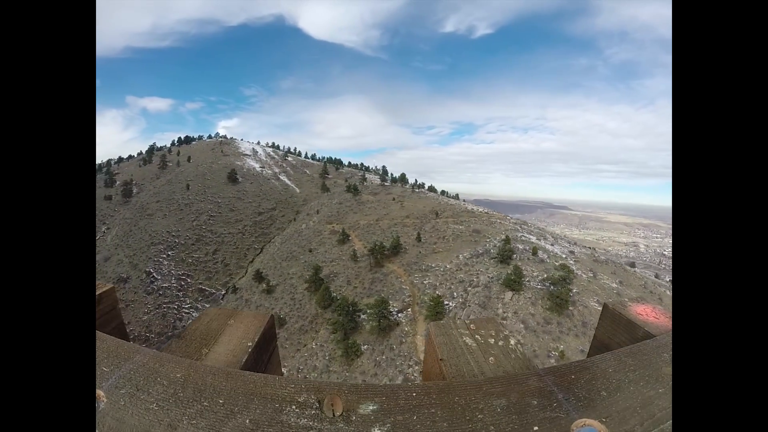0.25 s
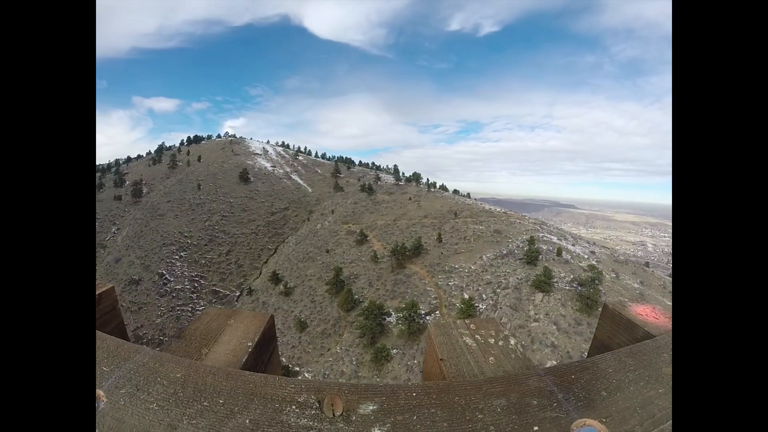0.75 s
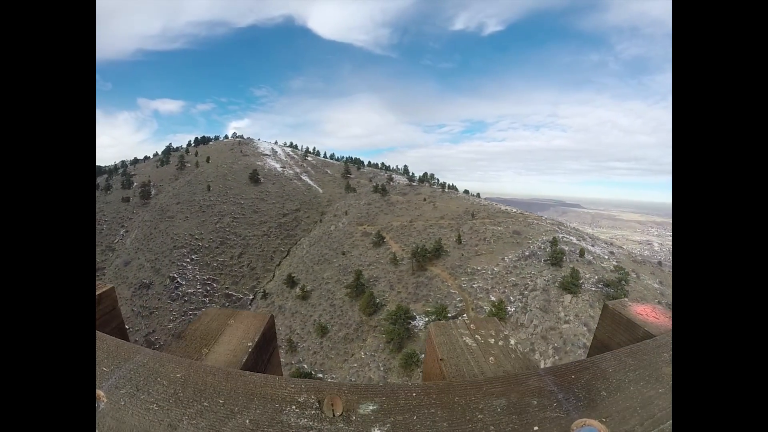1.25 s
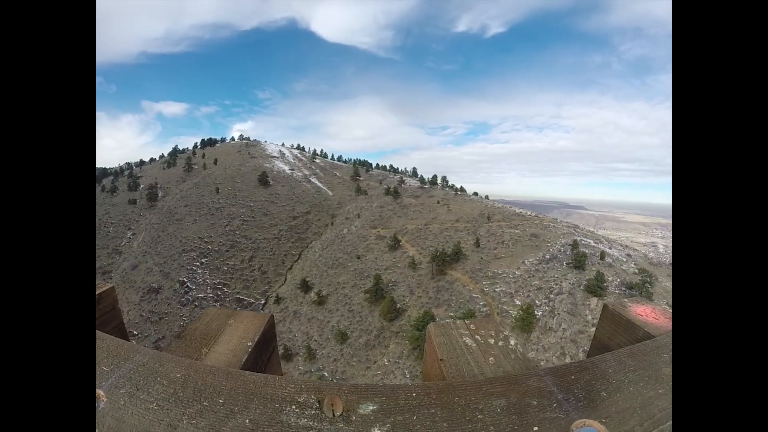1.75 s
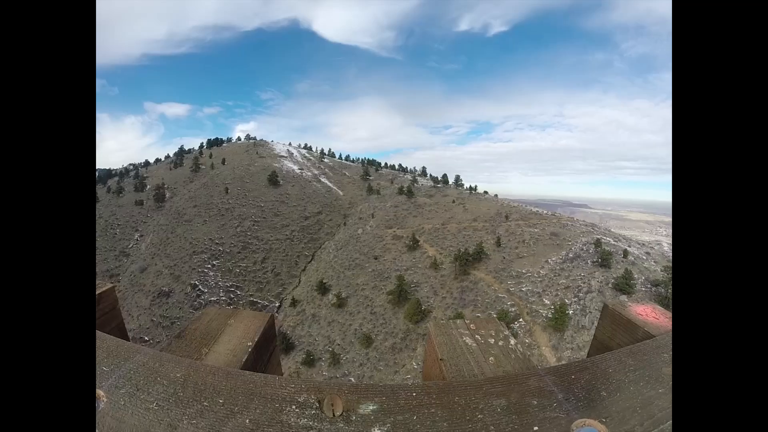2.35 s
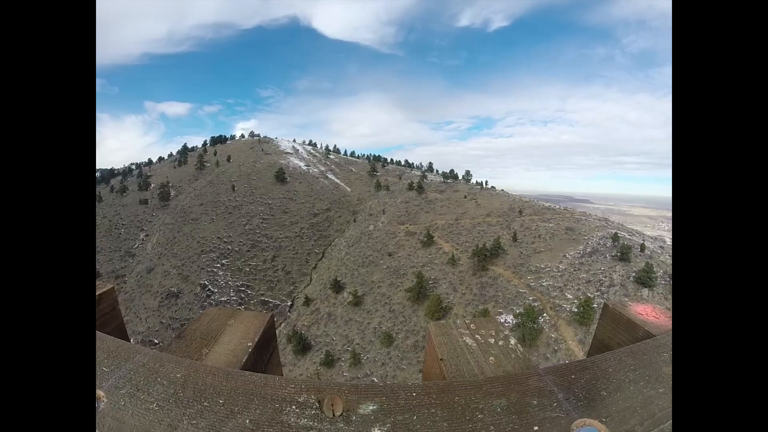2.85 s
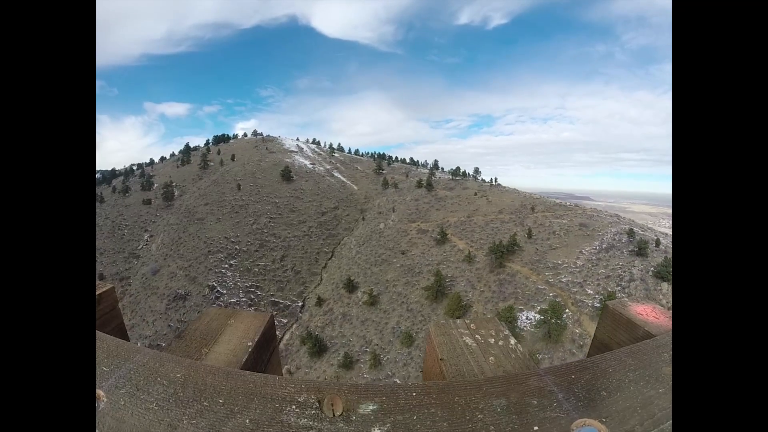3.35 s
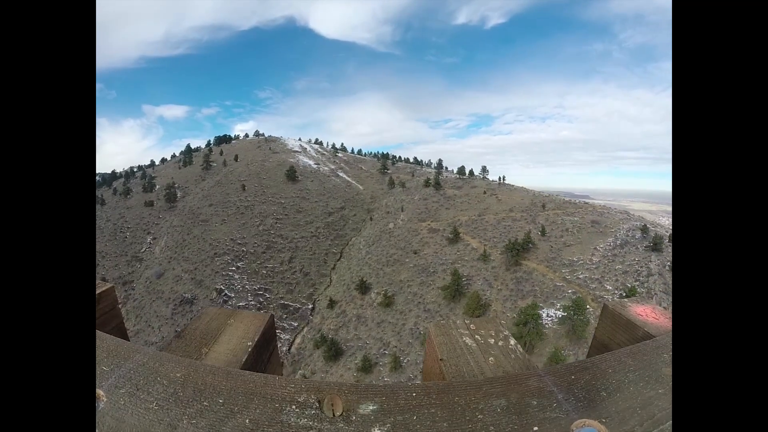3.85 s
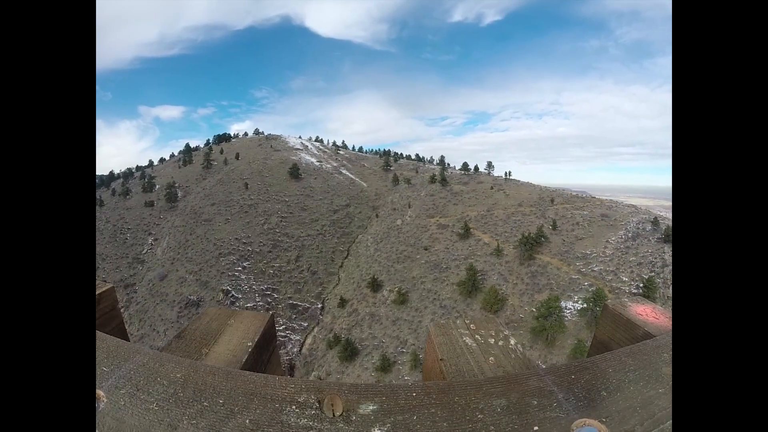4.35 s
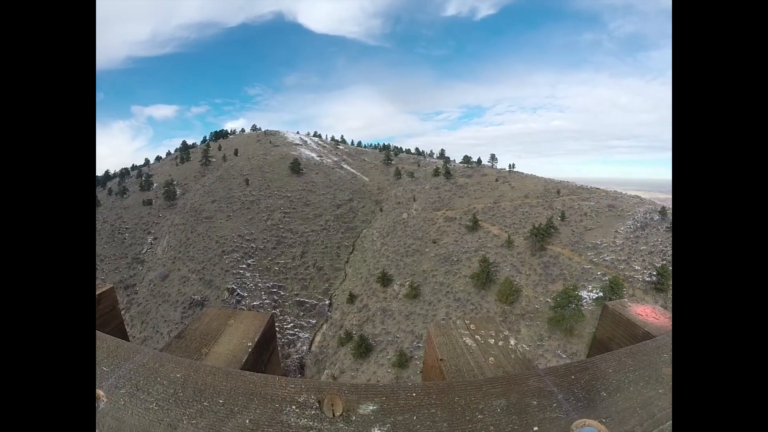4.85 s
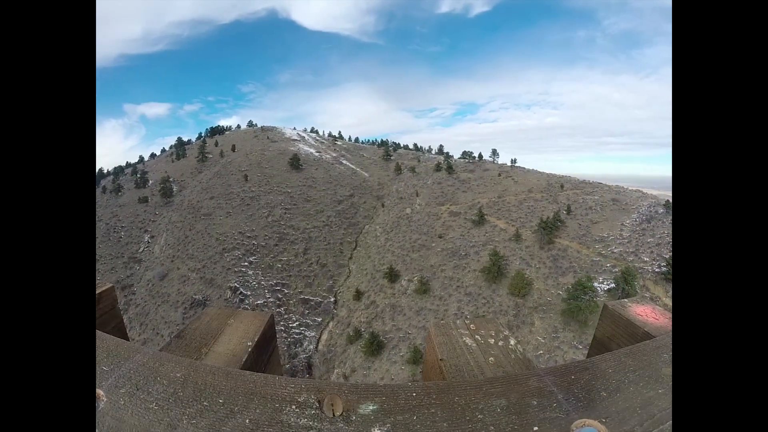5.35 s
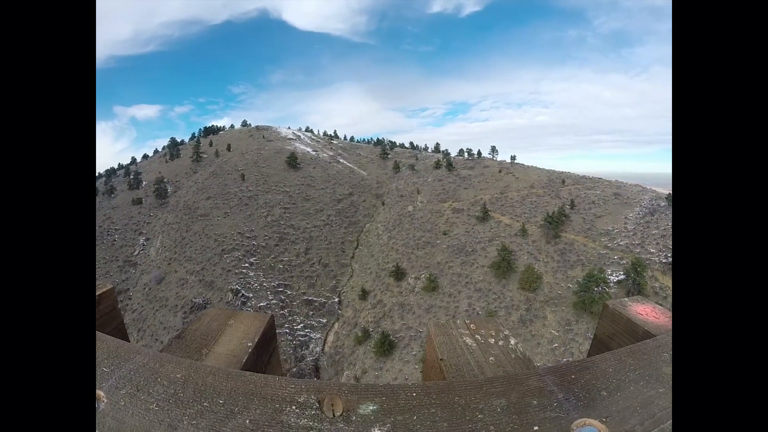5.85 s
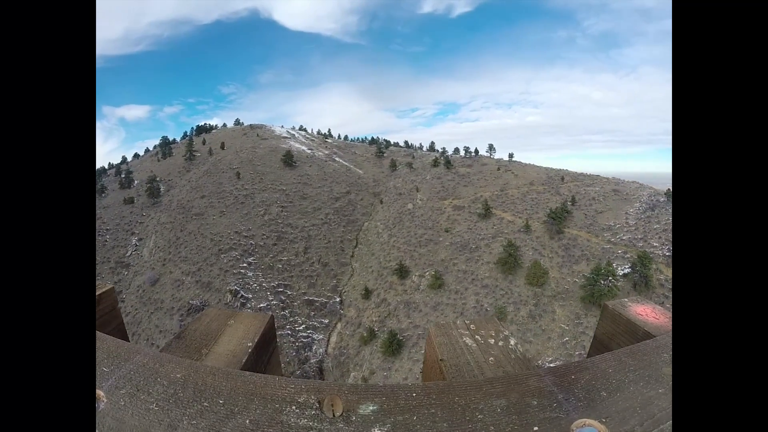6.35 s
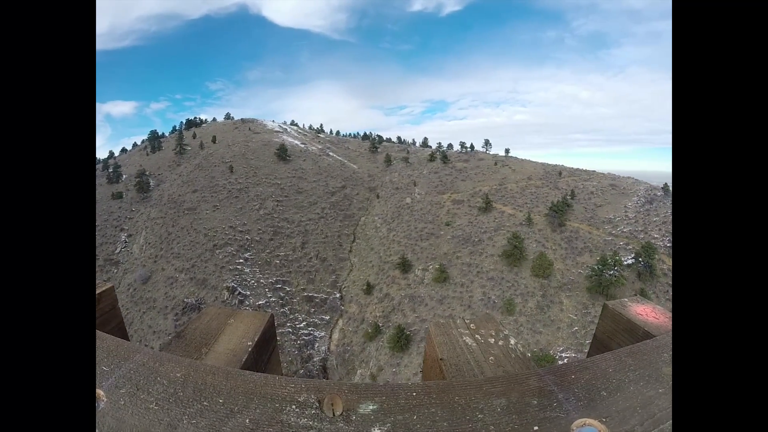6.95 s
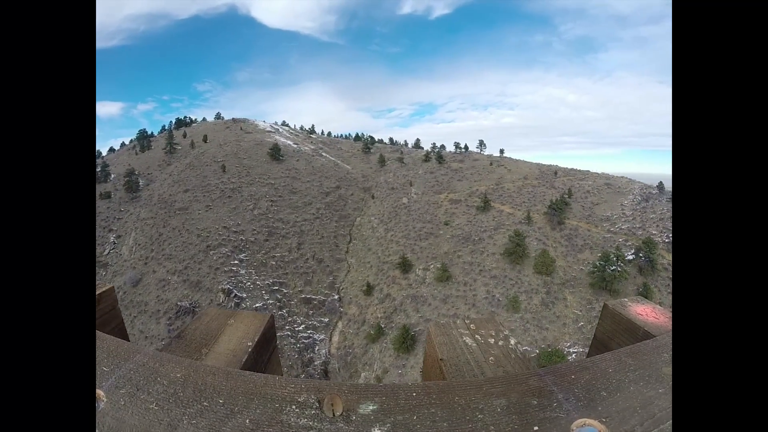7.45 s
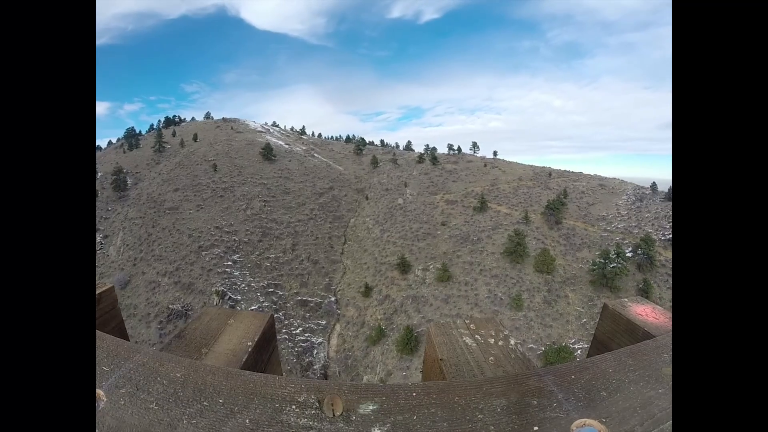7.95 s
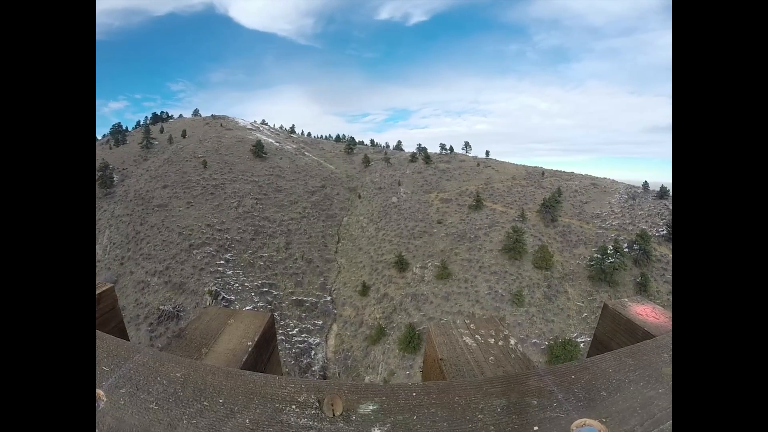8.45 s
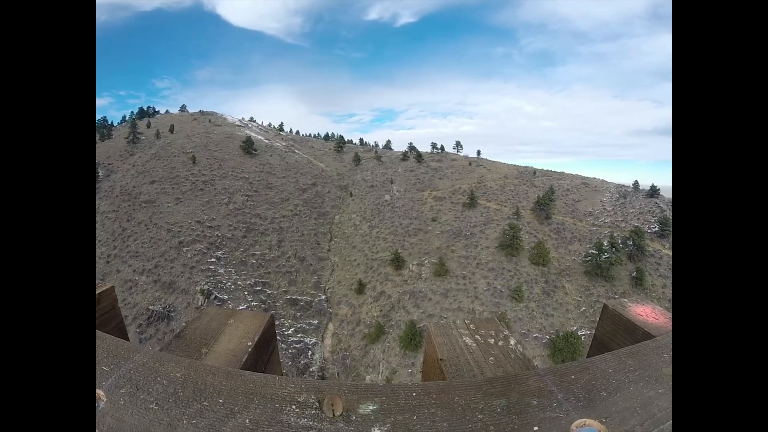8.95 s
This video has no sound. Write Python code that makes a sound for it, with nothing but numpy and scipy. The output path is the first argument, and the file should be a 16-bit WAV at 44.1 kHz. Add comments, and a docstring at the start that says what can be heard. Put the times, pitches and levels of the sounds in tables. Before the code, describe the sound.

Continuous helicopter flight noise from a small case mounted outside the aircraft. A harsh, resonant roar pulses about eleven times a second, with a faster tail-rotor flutter and steady turbine hiss. Low wind rumbles and hoots in hollow tones; from just over four seconds gusts spit and slap hard on the case, easing after about six, and the chop stands out again.

```python
"""A deep roar chopped about eleven times a second: a helicopter in forward flight, heard under its rotor.
The microphone sits in a small case mounted outside; the rotors modulate noise that rings in the case.
Slipstream eddies rumble as low noise and hoot across hollows as wavering sines.
Gusts spit and slap on the case as noise bursts; the turbine hisses as steady noise and its gears and
compressor sing as faint tones."""
import sys
import numpy as np
from scipy import signal
from scipy.fft import rfft, irfft, next_fast_len
from scipy.io import wavfile
from scipy.ndimage import uniform_filter1d

SR = 44100
rng = np.random.default_rng(int(sys.argv[2]) if len(sys.argv) > 2 else 0)


def materialize(psi):
    """Save the field psi as 16-bit PCM at rate SR to the path in sys.argv[1].

    A 1-D psi becomes a single channel; in a 2-D psi each row is a channel.
    """
    bounded = np.clip(np.atleast_2d(psi).T, -1, 1)
    quanta = np.round(bounded * 32767).astype(np.int16)
    wavfile.write(sys.argv[1], SR, quanta)


N = 406161


def from_db(db):
    """Logarithmic level: decibels to amplitude gain."""
    return 10 ** (np.asarray(db) / 20)


def rms_one(x):
    """Power normalisation: scale to an rms of one."""
    return x / np.sqrt(np.mean(x ** 2) + 1e-20)


def noise():
    """White noise: equal mean power at every frequency."""
    return rng.standard_normal(N)


def in_time(rows):
    """Linear interpolation: each column after time_s, sample by sample."""
    time_s, *columns = np.transpose(rows)
    return [np.interp(np.arange(N) / SR, time_s, column) for column in columns]


def cycles_of(hz):
    """Phase as the integral of frequency: cycles completed at a changing rate."""
    return np.cumsum(hz) / SR


def drift(rate_hz):
    """Low-passed chance: a random curve changing about rate_hz times a second, rms about 1."""
    # computed at a tenth of the sample rate; the first 8000 points let the filter settle
    pole = np.exp(-20 * np.pi * rate_hz / SR)
    slow = signal.lfilter([1], [1, -2 * pole, pole * pole], rng.standard_normal(N // 10 + 8002))[8000:]
    return np.interp(np.arange(N) / 10, np.arange(len(slow)), rms_one(slow))


def colour(x, spectrum, modes=()):
    """Minimum-phase filtering: a smooth spectrum with resonances that ring after excitation; rms 1."""
    size = 2 * next_fast_len(N // 2 + SR // 2)
    hz = np.maximum(np.arange(size // 2 + 1) * SR / size, 1)
    points_hz, levels_db = np.transpose(spectrum)
    response_db = np.interp(np.log(hz), np.log(points_hz), levels_db)
    for centre_hz, width_hz, boost_db in modes:
        response_db = response_db + boost_db / (1 + (2 * (hz - centre_hz) / width_hz) ** 2)
    # folding the cepstrum onto positive times makes the filter causal
    cepstrum = irfft(np.log(from_db(response_db)))
    cepstrum[1:size // 2] *= 2
    cepstrum[size // 2 + 1:] = 0
    response = np.exp(rfft(cepstrum))
    return rms_one(irfft(rfft(x, size) * response)[:N])


def cut(x, hz, kind, order=2):
    """Butterworth filtering: a low-pass or high-pass with a flat pass band."""
    return signal.sosfilt(signal.butter(order, hz, kind, fs=SR, output="sos"), x)


def tone(hz, wander_hz, rate_hz, flutter_db):
    """Random frequency and amplitude modulation: a sine shaken by turbulence; rms 1."""
    cycles = cycles_of(hz + wander_hz * drift(rate_hz))
    return rms_one(np.sin(2 * np.pi * cycles) * from_db(flutter_db * drift(rate_hz)))


def bursts_at(rows, rise_s):
    """Impulsive envelope: a quick swell and decay at each (time_s, peak_db)."""
    swell = np.zeros(N)
    age = np.arange(SR // 20) / SR / rise_s  # in rise times
    for time_s, peak_db in rows:
        start = int((time_s - rise_s / 2) * SR)
        swell[start:start + len(age)] += from_db(peak_db) * age * np.exp(1 - age)
    return swell


def held(start_s, length_s, attack_s, release_s):
    """Trapezoidal envelope: ramps centred on the start and the end, full level between."""
    t = np.arange(N) / SR
    rise = (t - start_s) / attack_s
    fall = (start_s + length_s - t) / release_s
    return np.clip(np.minimum(rise, fall) + .5, 0, 1)


# Main rotor's pace. Columns: time_s, blade_rate_hz
BLADE_RATE = [(0, 10.84), (1.0, 10.86), (1.7, 10.77), (2.3, 10.76), (3.0, 10.81), (3.6, 10.74),
              (4.9, 10.66), (6.2, 10.69), (6.9, 10.77), (8.2, 10.69), (9.2, 10.7)]


def blade_passes():
    """Periodic excitation: blade passes counted from the first, at .045 s."""
    return cycles_of(in_time(BLADE_RATE)[0]) - .045 * BLADE_RATE[0][1]


def blade_wash(passes, edge=3.0):
    """Saturated cosine: near +1 while a blade's wash sweeps over the case, near -1 between blades."""
    return np.tanh(edge * np.cos(2 * np.pi * passes))


# Blade loading. Columns: time_s, roar_db, chop_db (swing either way), whoosh_db
BLADE_LOAD = [(0, -31.5, 0.5, -50), (1.2, -32, 2, -51), (2.2, -33.5, 2.5, -59), (2.7, -32, 2, -59),
              (3.2, -33, 2.5, -56), (4.1, -34, 2, -47), (5.0, -32.5, 3, -46.5), (6.0, -32.5, 2.5, -41.5),
              (7.0, -32.5, 2.5, -46), (7.8, -33.5, 4.5, -44.5), (8.5, -32.5, 3.5, -44.5),
              (9.2, -33.5, 4, -42)]
# Tip vortex, one hit in each pass. Columns: time_s, place_passes, boost_db
TIP_VORTEX = [(0, -0.062, -4), (.5, -0.053, 1), (1.8, 0.059, -2), (2.3, 0.035, 7), (2.9, 0.017, 3),
              (3.3, -0.12, 7), (4.3, -0.17, 2.5), (7.0, -0.3, 6.5), (7.8, -0.23, 6.5), (8.4, -0.21, 5.5),
              (9.2, -0.23, 0)]
# Sharpest blade cracks. Columns: time_s, peak_db (before the crack gain and the colouring)
BLADE_CRACKS = [(0.1431, -17), (0.2016, -23), (0.5058, -13), (2.5408, -13), (3.914, -14), (4.566, -25),
                (5.4103, -15), (7.3695, -16), (7.8262, -20), (7.9309, -25.5), (8.1179, -18), (8.302, -19),
                (8.704, -14), (8.7697, -15.5)]
# Roar spectrum, relative density. Columns: frequency_hz, density_db (per Hz)
ROAR_SPECTRUM = [(120, 7), (280, -1), (400, -5.5), (700, -2), (1000, -3), (1270, -11), (1800, -8.5),
                 (2500, -11), (3200, -15.5), (3900, -27.5), (5500, -26.5), (8000, -35), (11000, -43.5),
                 (15000, -45)]
# Case resonances, and a notch where negative. Columns: centre_hz, width_hz, boost_db
CASE_MODES = [(490, 55, 4), (782, 190, 4.5), (1474.6, 204, 12.5), (1607.6, 160, 12.5), (2138, 360, 14.5),
              (2260, 230, 2.5), (2780, 340, 9), (3590, 390, 6.5), (4307, 340, 13.5), (4980, 190, 10),
              (5810, 140, 7.5), (6400, 224, 2.5), (6870, 240, 6.5), (7370, 300, 6), (8300, 270, 11),
              (8540, 170, -11), (8860, 310, 14), (9660, 450, 10), (10330, 290, 14.5), (11400, 620, 7),
              (12700, 467, 6.2)]


def roar(passes, tail_db=1.5, grain_db=2.0, vortex_passes=0.033, crack_db=-3.5,
         hiss_db=6.0, hiss_grain_db=1.5, split_hz=5200):
    """Amplitude-modulated noise: both rotors chop the roar, turbine hiss tops it, the case resonates."""
    level_db, chop_db, _ = in_time(BLADE_LOAD)
    place, vortex_db = in_time(TIP_VORTEX)
    # sudden, then fading
    since_vortex = (passes - place + vortex_passes / 2) % 1
    vortex = np.exp(-(since_vortex / vortex_passes) ** 2)
    # the tail rotor flutters 5.09 times per main blade pass, with a second harmonic
    tail_passes = 5.09 * passes
    tail = np.cos(2 * np.pi * tail_passes) + 0.75 * np.cos(4 * np.pi * tail_passes)
    swell_db = chop_db * blade_wash(passes) + vortex_db * vortex + tail_db * tail + grain_db * drift(190)
    chopped = rms_one(from_db(swell_db) * noise())
    # the roar level, applied last, is taken out of the cracks first
    cracks = bursts_at(BLADE_CRACKS, rise_s=0.00036) * from_db(crack_db - level_db) * noise()
    hiss = from_db(hiss_db + hiss_grain_db * drift(94)) * noise()
    air = cut(chopped + cracks, split_hz, "low") + cut(hiss, split_hz, "high")
    return from_db(level_db) * colour(cut(air, 126, "high"), ROAR_SPECTRUM, CASE_MODES)


def whoosh(passes, low_hz=195, high_hz=290, chop_db=0.5):
    """Band-limited noise under slight modulation: loaded blades push down dull puffs of air."""
    band = cut(cut(noise(), low_hz, "high", order=3), high_hz, "low", order=3)
    puffs = rms_one(band * from_db(chop_db * blade_wash(passes)))
    return from_db(in_time(BLADE_LOAD)[2]) * puffs


# Slipstream buffeting on the case. Columns: time_s, level_db
BUFFETING = [(0, -31), (1.05, -37.5), (1.45, -32.5), (2.1, -31.5), (2.8, -32.5), (3.3, -28.5),
             (4.05, -29.5), (4.27, -25.5), (4.8, -25.5), (5.3, -31.5), (5.85, -26.5), (6.1, -30.5),
             (6.4, -27), (6.9, -32), (7.5, -34), (7.8, -37.5), (8.6, -39), (8.8, -37), (9.2, -32.5)]
# Rumble spectrum, relative. Columns: frequency_hz, level_db
RUMBLE_SPECTRUM = [(30, -10.5), (55, -17), (70, 0), (95, 3.5), (114, 6), (130, 1), (160, -2), (195, -10),
                   (240, -13.5), (330, -31), (600, -30.5), (3000, -87)]
USUAL_BUFFET_DB = -29.5


def slipstream(lump_db=2.5, deep_db=-31, deep_follows=0.77, deep_low_hz=14, deep_high_hz=36):
    """Turbulent pressure noise: eddies rumble in uneven lumps; the biggest swing less in level."""
    buffet_db, = in_time(BUFFETING)
    lumps = rms_one(from_db(lump_db * drift(11)) * colour(noise(), RUMBLE_SPECTRUM))
    big_eddies = rms_one(cut(cut(noise(), deep_low_hz, "high"), deep_high_hz, "low"))
    big_eddy_db = deep_db + deep_follows * (buffet_db - USUAL_BUFFET_DB)
    return from_db(buffet_db) * lumps + from_db(big_eddy_db) * big_eddies


# Times when the lower note catches and holds. Columns: start_s, length_s, level_db
CAUGHT_HOOTS = [(0.0, 0.45, -33.5), (1.29, 0.22, -25.5), (1.631, 0.28, -23.5), (2.915, 0.15, -26.5),
                (4.506, .62, -23), (5.2, .15, -22.5), (5.465, 0.23, -28), (5.802, 0.14, -22.5)]
# Upper note, wandering more once the flow turns rough.
# Columns: time_s, pitch_hz, wander_hz, level_db (before the unsteadiness)
UPPER_NOTE = [(0, 174.5, 3.3, -28.5), (.5, 178.6, 3, -30), (1.1, 177.1, 3, -27), (1.9, 179, 10, -36.5),
              (3.7, 180.1, 11, -40.5), (4.85, 177.7, 11.4, -29.5), (5.3, 178.6, 13.6, -34),
              (6.6, 179.2, 14.4, -37.5), (9.2, 179.8, 15, -35.5)]
# Faint edge whistle. Columns: time_s, pitch_hz, level_db
EDGE_WHISTLE = [(0, 515, -48.5), (.3, 506, -44), (.7, 515, -46.5), (1.2, 502, -57), (2, 503, -77),
                (9.2, 493, -63)]


def hoots(low_hz=144, low_db=-32, low_follows=1.15, fitful_db=5.5, unsteady_db_per_hz=.25):
    """Cavity and edge tones: air blows two notes across hollows of the case and whistles on an edge."""
    # the low note comes fitfully, rising with the buffeting
    buffet_db, = in_time(BUFFETING)
    fitful_level = from_db(low_db + low_follows * (buffet_db - USUAL_BUFFET_DB))
    fitful = fitful_level * rms_one(from_db(fitful_db * np.tanh(drift(6.9))))
    caught = sum(from_db(level_db) * held(start_s, length_s, attack_s=0.062, release_s=0.071)
                 for start_s, length_s, level_db in CAUGHT_HOOTS)
    low = (fitful * tone(low_hz, wander_hz=6.06, rate_hz=24.5, flutter_db=2.5)
           + caught * tone(low_hz, wander_hz=4.43, rate_hz=24, flutter_db=2.0))
    # the more the upper note wanders in pitch, the more its level swings
    note_hz, wander_hz, note_db = in_time(UPPER_NOTE)
    swing_db = unsteady_db_per_hz * wander_hz * np.tanh(drift(11.5))
    high = from_db(note_db + swing_db) * tone(note_hz, wander_hz, rate_hz=27, flutter_db=1.5)
    whistle_hz, whistle_db = in_time(EDGE_WHISTLE)
    whistle = from_db(whistle_db) * tone(whistle_hz, wander_hz=17, rate_hz=70, flutter_db=2.5)
    return low + high + whistle


# Gusts on the case. Columns: start_s, length_s, level_db (before the gust gain), brightness_db
CASE_GUSTS = [(4.272, 0.19, -41, -2.5), (4.478, .13, -37, -4), (4.625, 0.57, -35, -1.5),
              (5.46, 0.54, -35.5, -1), (6.043, 0.39, -35, -7), (6.724, 0.3, -36, -3),
              (7.184, 0.17, -36, -9), (7.45, 0.2, -42.5, -7), (8.74, 0.31, -40, -9)]
# Light spitting beneath and between gusts. Columns: time_s, level_db (before the gust gain)
LIGHT_DRAUGHT = [(0, -50.5), (1.4, -49), (2.1, -53.5), (3.5, -45.5), (4.1, -47.5), (5.3, -57), (6.7, -41),
                 (7.9, -63), (8.6, -64), (9.2, -44)]
# Spit spectrum, relative. Columns: frequency_hz, level_db
SPIT_SPECTRUM = [(600, -14.5), (1250, -13), (1800, -5), (2350, 3), (2750, -2), (3200, -10.5), (3650, -11),
                 (4300, -17), (4900, -17.5), (5350, -10), (6300, -11.5), (7200, -20.5), (8200, -27.5),
                 (14500, -49)]


def gusts(gust_db=5.0, draught_bright_db=-3.0, burst_db=8.0, crackle_db=2.0, split_hz=4200):
    """Intermittent turbulence: fast air tears off the case in short spits of noise."""
    # independent flows add in power
    dull_power = from_db(in_time(LIGHT_DRAUGHT)[0]) ** 2
    bright_power = dull_power * from_db(draught_bright_db) ** 2
    for start_s, length_s, level_db, bright_db in CASE_GUSTS:
        gust = from_db(level_db) * held(start_s, length_s, attack_s=0.036, release_s=0.12)
        dull_power = dull_power + gust ** 2
        bright_power = bright_power + (gust * from_db(bright_db)) ** 2
    speed = from_db(burst_db * np.tanh(drift(69) / 1.21) + crackle_db * drift(640))

    def spits(force):
        """Local power normalisation: spits share out the power of each eighth of a second."""
        force = force / np.sqrt(uniform_filter1d(force ** 2, size=SR // 8))
        return colour(force * noise(), SPIT_SPECTRUM)

    # the treble grows faster with air speed, so strong spits are brighter
    dull = cut(spits(speed), split_hz, "low")
    bright = cut(spits(speed ** 1.3), split_hz, "high")
    return from_db(gust_db) * (np.sqrt(dull_power) * dull + np.sqrt(bright_power) * bright)


# Hardest slaps of air. Columns: time_s, peak_db (before the part gains), dull_db (relative to peak_db)
AIR_SLAPS = [(2.5134, -26, 4), (4.319, -26, 4), (4.4858, -15.5, 6), (4.596, -19, -2), (4.6466, -15, 6),
             (4.7439, -13.5, -4), (4.8, -16, 0), (4.85, -24, 10.5), (4.9165, -21, 2), (5.0174, -17.5, 5.5),
             (5.4805, -22.5, 10), (5.5236, -16, -6), (5.6842, -30, 7), (5.7356, -16, 0), (5.835, -18, 2),
             (5.879, -14.5, -7), (5.9384, -15, 1), (5.9896, -16.5, 4.5), (6.0663, -14, 2),
             (6.741, -23, -0.5), (6.7792, -23, -1), (6.823, -22, 6), (7.09, -27, 8), (7.222, -26, 12)]
# Spectrum of their hiss, relative density. Columns: frequency_hz, density_db (per Hz)
HISS_SPECTRUM = [(2500, -23), (4700, -30), (5400, 7), (6400, 5.5), (7200, -7), (8200, -14.5), (14000, -31)]
# Spectrum of their dull part, relative density. Columns: frequency_hz, density_db (per Hz)
BODY_SPECTRUM = [(500, -15), (1400, -26), (2300, 8), (2900, -3), (4500, -24), (9000, -65)]


def slaps(hiss_db=-12.5, body_db=-10.5):
    """Impulsive excitation: single big eddies burst as a short hiss and a slightly longer dull puff."""
    hiss = bursts_at([(time_s, peak_db) for time_s, peak_db, _ in AIR_SLAPS], rise_s=0.0019)
    body = bursts_at([(time_s, peak_db + dull_db) for time_s, peak_db, dull_db in AIR_SLAPS], rise_s=0.003)
    return (from_db(hiss_db) * hiss * colour(noise(), HISS_SPECTRUM)
            + from_db(body_db) * body * colour(noise(), BODY_SPECTRUM))


# Gear and turbine tones. Columns: pitch_hz, level_db
GEAR_TONES = [(215, -50), (818, -58), (1066, -62), (1395, -59), (3163, -61)]
# Compressor whine. Columns: time_s, pitch_hz, level_db
COMPRESSOR_WHINE = [(0, 13800, -86), (2.6, 14150, -84), (3.2, 14220, -81), (4.1, 14080, -81),
                    (4.8, 13860, -88), (9.2, 14050, -92)]


def turbine():
    """Narrow-band tones: meshing gears sing at set pitches above which a faint compressor whine glides."""
    gears = sum(from_db(level_db) * tone(pitch_hz, wander_hz=2.0, rate_hz=6, flutter_db=1.5)
                for pitch_hz, level_db in GEAR_TONES)
    whine_hz, whine_db = in_time(COMPRESSOR_WHINE)
    return gears + from_db(whine_db) * tone(whine_hz, wander_hz=25, rate_hz=40, flutter_db=3)


def scene():
    """Superposition: rotor, wind and turbine add at one microphone."""
    passes = blade_passes()
    rotor = roar(passes) + whoosh(passes)
    wind = slipstream() + hoots() + gusts() + slaps()
    return (rotor + wind + turbine())[None]


def record(dry):
    """Band limiting: a steep elliptic low-pass at 15100 Hz."""
    return signal.sosfilt(signal.ellip(14, .1, 90, 15100, fs=SR, output="sos"), dry)


dry = scene()
out = record(dry)
materialize(out)
```